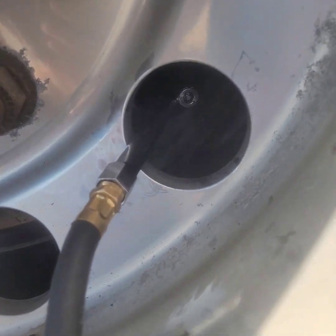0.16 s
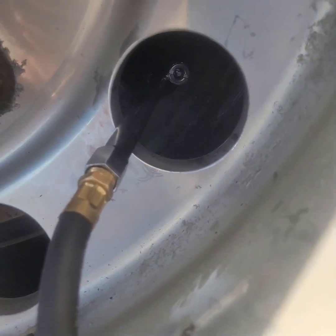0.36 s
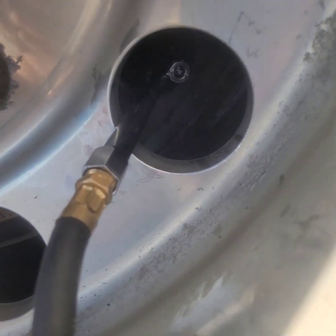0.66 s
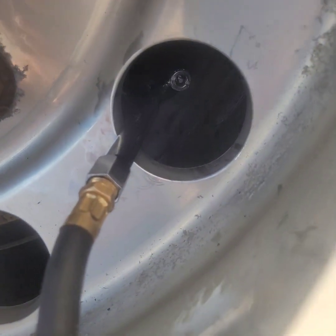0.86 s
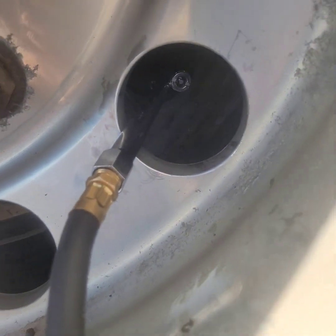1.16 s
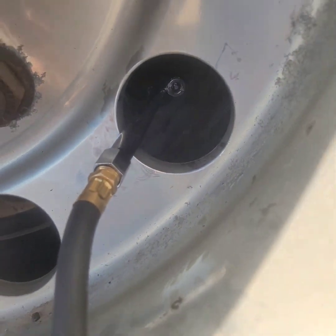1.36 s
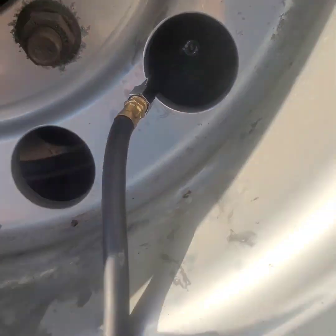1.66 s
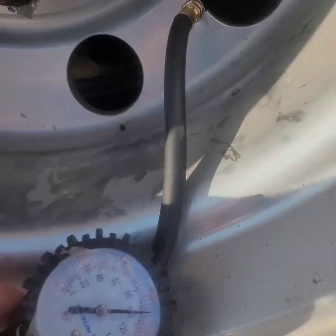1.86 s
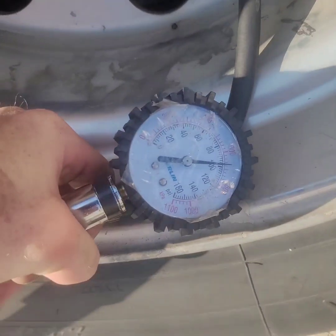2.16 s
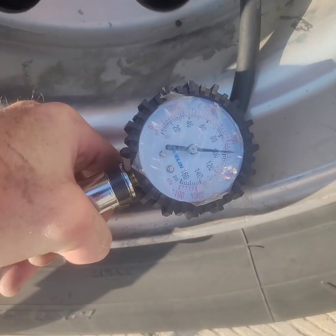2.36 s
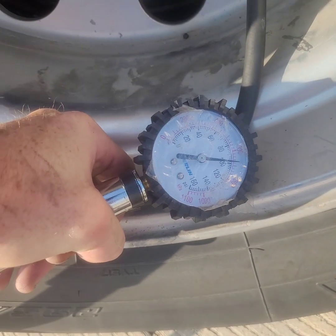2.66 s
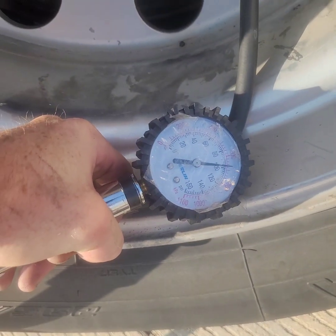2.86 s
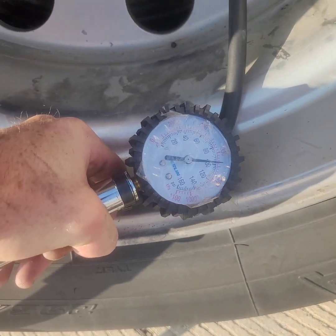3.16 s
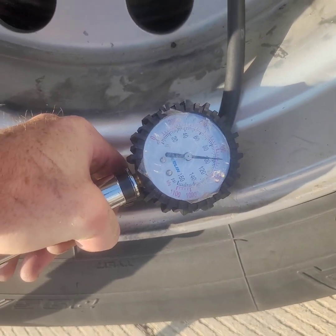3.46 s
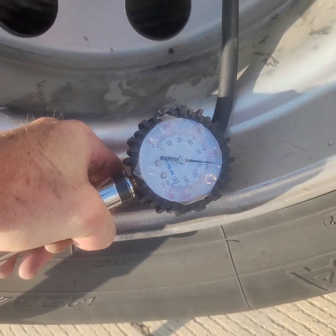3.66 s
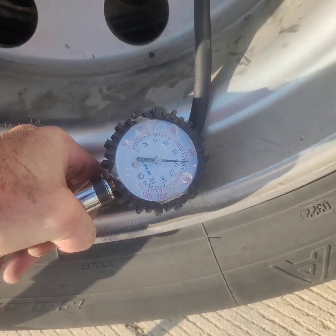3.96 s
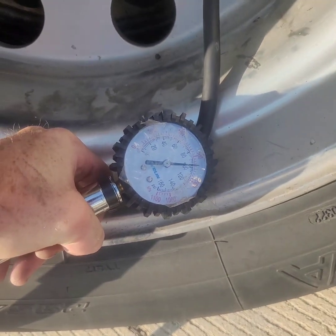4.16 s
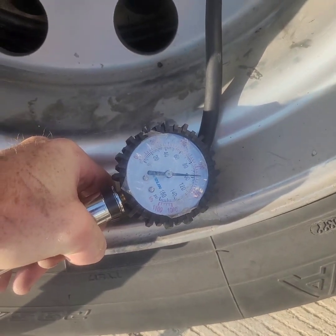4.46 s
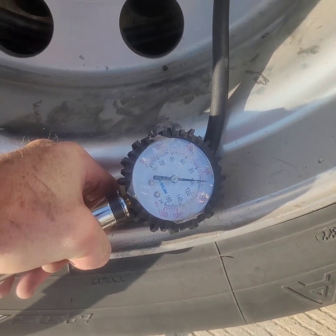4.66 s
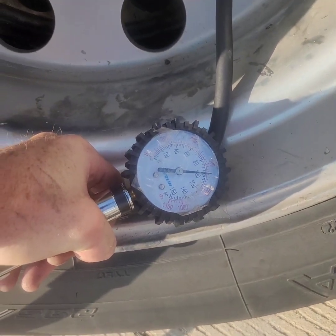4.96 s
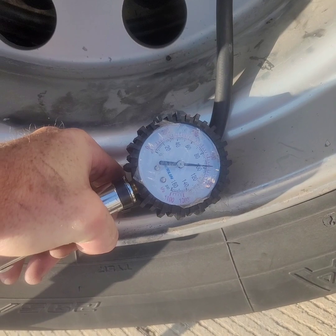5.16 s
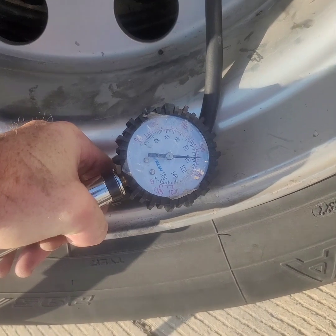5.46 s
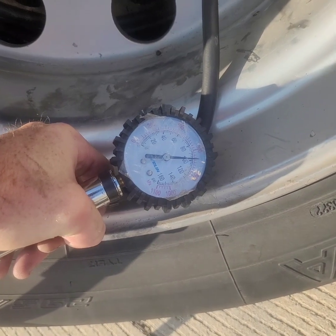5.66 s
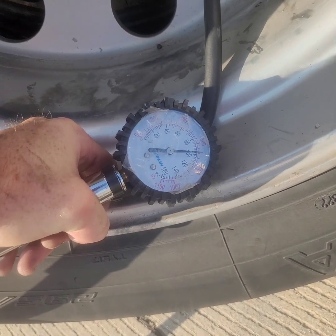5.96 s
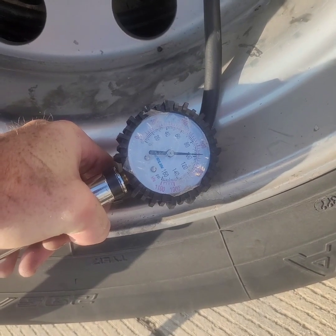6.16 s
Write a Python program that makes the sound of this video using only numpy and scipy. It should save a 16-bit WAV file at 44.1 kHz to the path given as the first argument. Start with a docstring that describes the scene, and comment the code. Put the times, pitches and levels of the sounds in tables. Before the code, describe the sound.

A nearby engine rumbles and clatters steadily while compressed air hisses, thin and very bright, into a truck tire, with a few dull early thuds.

```python
"""At the metal wheel of a truck: compressed air hisses through a chuck and gauge into the tire.
An engine runs steadily nearby: firing tones, puffing rumble, clatter and thin belt-drive whines.
The microphone starts at the valve hole, in the booming hollow of the wheel, then backs away to the gauge.
The air is coloured noise; a sliding reflection off the wheel gives its brightest part a hollow colour.
A few low thuds fall early on, and at the gauge the engine noise and the air step up in level."""
import sys
import numpy as np
from scipy import signal
from scipy.fft import rfft, irfft
from scipy.io import wavfile

SR = 44100
rng = np.random.default_rng(int(sys.argv[2]) if len(sys.argv) > 2 else 0)


def transcribe(u):
    """Save the signal u as a 16-bit wav file named by the first command-line argument.

    u: samples, shape (n,) or (channels, n), limited to [-1, 1]; the rate is SR.
    q: integer samples, one column per channel.
    """
    v = np.clip(np.atleast_2d(u).T, -1, 1)
    q = np.round(v * 32767).astype(np.int16)
    wavfile.write(sys.argv[1], SR, q)


N = 277830

# Orders of the engine's firing pulses, four firings a cycle:
# (multiple of the cycle rate [-], relative level [dB])
FIRING_ORDERS = [(2, -6.5), (3, -23.5), (4, 0), (6, -15), (7, -10), (8, -7.5), (10, -13.5), (11, -27.5),
                 (12, -15.5), (15, -24.5), (19, -24.5)]
# Faint tones of the belt-driven parts: (frequency [Hz], rms level [dB])
BELT_WHINES = [(263.5, -38.5), (305, -45), (528, -48.5), (625, -52.5), (666, -54)]
# Resonances of the wheel's hollow: (frequency [Hz], half-width at half gain [Hz], rms level up close [dB])
HOLLOW_MODES = [(50.5, 5.6, -24.5), (70.5, 9.2, -25.5), (133, 26, -31), (244, 22, -29.5),
                (388.4, 15.4, -32), (457, 11, -43), (530, 40, -42), (840, 73, -37.5), (1005, 140, -36.5),
                (1380, 210, -42.5), (4500, 640, -51.5)]
# Spectra of the engine's exhaust rumble and clatter: (frequency [Hz], relative density [dB per Hz])
RUMBLE_SPECTRUM = [(20, -28), (32, -28), (44, 0), (60, -1.5), (72, -1), (88, -3.5), (110, -1.5), (132, 1),
                   (185, -6), (240, -2), (290, -8), (400, -14), (600, -20), (3000, -67)]
CLATTER_SPECTRUM = [(100, -20.5), (300, -5.5), (470, -4), (640, 0.8), (780, -3), (950, -2.5), (1100, -6.5),
                    (1320, -7.5), (1600, -12.5), (2200, -17.5), (4000, -42.5), (10000, -57)]
# Spectra of the air in hose, chuck and valve core: (frequency [Hz], relative density [dB per Hz])
RUSH_SPECTRUM = [(800, -3.5), (2000, -1), (2900, 1.5), (3500, 0.2), (4000, -2.5), (5000, -4), (6000, -12.5),
                 (8000, -10), (12000, -36)]
SIZZLE_SPECTRUM = [(4000, -12), (5800, -2), (6700, -1.5), (7700, 0.5), (8400, -3.5), (9200, -6),
                   (10500, -3), (13000, -12)]
JET_SPECTRUM = [(7000, -40), (9200, -17), (9900, -8), (10600, -7.5), (11400, -3), (12500, -3),
                (13500, -1.5), (14700, -0.5), (15300, 5), (15750, 1)]
# Left-right likeness of the noise: (frequency [Hz], correlation, -1 opposed to 1 alike [-])
SIDE_LIKENESS = [(60, 0.26), (170, 0.94), (260, 0.78), (400, 0.48), (600, 0.47), (850, -0.35),
                 (1500, -0.17), (2500, 0.12), (6000, -0.16), (15000, 0.054)]
# Dull bumps over the hum: (time [s], envelope peak [dB])
BUMP_TIMES = [(0.608, -4), (1.169, -12), (1.339, -9), (2.006, -8)]
# Lag of the wheel's reflection at the gauge, following the sway of the hand: (time [s], lag [ms])
GAUGE_LAG = [(2.3, .62), (2.7, .568), (3.1, .54), (3.5, .568), (4.0, 0.53), (4.7, .56), (5.3, .489)]

# Layer levels before panning, after the step up: (at the valve [dB], at the gauge [dB])
HUM_DB = (-18.5, -20.0)   # for firing orders at 0 dB
RUMBLE_DB = (-18.5, -22)
CLATTER_DB = (-27, -27)
RUSH_DB = (-41, -40.5)
SIZZLE_DB = (-40, -44.5)
JET_DB = (-31, -31)

CYCLE_HZ = 20.8
PORT_PHASE = 0.4   # radians by which the left microphone port leads, at every frequency
LOW_CUT_HZ, CUTOFF_HZ = 18, 15770
# middle and length of the microphone's one move out of the hollow
BACK_AWAY_AT_S, BACK_AWAY_S = 1.446, 0.58
# middle, length and size of the step up at the gauge
STEP_AT_S, STEP_S, STEP_DB = 2.58, 0.29, 2
# the rush overshoots at that step, then settles
RUSH_SWELL_DB, RUSH_SETTLE_S = 1.7, 0.76
VALVE_LAG_MS = 0.313   # lag of the wheel's reflection at the valve

TIME = np.arange(N) / SR
HZ = np.maximum(np.fft.rfftfreq(N, 1 / SR), 1)
SIDES = np.array([[1], [-1]])   # left, right


def from_db(db):
    """Decibels to gain."""
    return 10 ** (np.asarray(db) / 20)


def rms_one(x):
    """Scale to unit rms."""
    return x / np.sqrt(np.mean(x ** 2) + 1e-20)


def over_hz(points):
    """A table joined by straight lines on a log-frequency axis."""
    hz, value = np.transpose(points)
    return np.interp(np.log(HZ), np.log(hz), value)


def pan(left_db):
    """Gains of the two sides for a left-minus-right level."""
    return from_db(SIDES * left_db / 2)


def ease(middle_s, length_s):
    """A smooth move from 0 to 1."""
    progress = np.clip((TIME - middle_s) / length_s, -.5, .5)
    return (1 + np.sin(np.pi * progress)) / 2


def nearness():
    """1 while the microphone is in the hollow of the wheel, 0 once it has backed away."""
    return 1 - ease(BACK_AWAY_AT_S, BACK_AWAY_S)


def heard_db(*layers):
    """Each layer passes from its valve level to its gauge level; all are held down until the step."""
    near = nearness()
    held_down_db = STEP_DB * (1 - ease(STEP_AT_S, STEP_S))
    return [near * valve_db + (1 - near) * gauge_db - held_down_db for valve_db, gauge_db in layers]


def drift(rate_hz):
    """Random wander of rms 1: white noise with the parts faster than the rate damped."""
    damping = 1 + (HZ / rate_hz) ** 2
    return rms_one(irfft(rfft(rng.standard_normal(N)) / damping, N))


def turbulence(gain):
    """Stereo noise of rms 1, coloured by a gain per frequency; the sides mix a shared and an opposed part."""
    shared, opposed = rfft(rng.standard_normal((2, N)))
    alike = np.clip(over_hz(SIDE_LIKENESS), -1, 1)
    both = np.sqrt(1 + alike) * shared + np.sqrt(1 - alike) * opposed * SIDES
    port_lead = np.exp(.5j * PORT_PHASE * SIDES)
    return rms_one(irfft(gain * both * port_lead, N))


def flow(spectrum, level_db, flutter_db, flutter_hz):
    """Turbulence with a spectrum, a level and a slight random flutter."""
    level = from_db(level_db + flutter_db * drift(flutter_hz))
    return level * turbulence(from_db(over_hz(spectrum)))


def echoes(x, lags_s, shares):
    """Add reflections whose lags may move, then scale to keep the power roughly the same."""
    fine = signal.resample_poly(x, 4, 1, axis=1)   # quarter-sample steps let the lags slide
    out = x
    for lag_s, share in zip(lags_s, shares):
        at = np.clip(np.round(4 * SR * (TIME - lag_s)), 0, 4 * N - 1).astype(int)
        reflection = np.take_along_axis(fine, np.broadcast_to(at, x.shape), axis=1)
        out = out + share * reflection
    return out / np.sqrt(1 + sum(share ** 2 for share in shares))


def scattered(x, share, longest_s, sway_s, count):
    """Weak reflections off rim, tire and ground ripple the spectrum; the hand's sway shifts them."""
    sway = sway_s * drift(1.2)
    lags = []
    for _ in range(count):
        rest_lag = rng.uniform(0.000996, longest_s, (2, 1))   # each side has its own
        lags.append(rest_lag + rng.standard_normal((2, 1)) * sway)
    signs = rng.choice([-1, 1], (count, 2, 1))
    return echoes(x, lags, signs * share / np.sqrt(count))


def hum(angle, uneven, scatter):
    """Firing tones locked to the cycle angle; all waver as the cylinders vary, odd orders twice as much."""
    out = 0
    port_lead = .5 * PORT_PHASE * SIDES
    for order, level_db in FIRING_ORDERS:
        waver = uneven * drift(5.4) * (1 if order % 2 else .5)
        start = scatter * rng.standard_normal()
        out = out + from_db(level_db) * (1 + waver) * np.cos(order * angle + port_lead + start)
    return np.sqrt(2) * out


def engine():
    """Firing hum, exhaust rumble that puffs with crank turns and firings, and lightly pulsing clatter."""
    hum_db, rumble_db, clatter_db = heard_db(HUM_DB, RUMBLE_DB, CLATTER_DB)
    cycle_hz = CYCLE_HZ * (1 + 0.0019 * drift(1.25))
    angle = 2 * np.pi * np.cumsum(cycle_hz) / SR
    puffs = (np.cos(2 * angle) + np.cos(4 * angle)) / 2   # two turns, four firings a cycle
    tones = from_db(hum_db) * hum(angle, uneven=0.22, scatter=0.54)
    rumble = flow(RUMBLE_SPECTRUM, rumble_db, flutter_db=0.55, flutter_hz=11) * (1 + 0.12 * puffs)
    clatter = flow(CLATTER_SPECTRUM, clatter_db, flutter_db=0.58, flutter_hz=22) * (1 + 0.037 * puffs)
    clatter = scattered(clatter, share=0.3, longest_s=.015, sway_s=0.00013, count=6)
    return (tones + rumble) * pan(left_db=-0.44) + clatter * pan(left_db=-1.0)


def whines():
    """Thin tones from the belt drive, their phases wandering at random."""
    out = np.zeros(N)
    for hz, level_db in BELT_WHINES:
        phase = 2 * np.pi * hz * TIME + 1.73 * drift(2.75)
        out += from_db(level_db) * np.sqrt(2) * np.cos(phase)
    return out


def wheel_hollow():
    """The engine's noise booms in the dish of the wheel: resonant noise bands heard only close to it."""
    boom = 0
    for hz, width_hz, level_db in HOLLOW_MODES:
        resonance = 1 / (1 + ((HZ - hz) / width_hz) ** 2)
        boom = boom + from_db(level_db) * turbulence(resonance)
    return nearness() * boom


def off_wheel(x, left_share, right_share):
    """One short reflection combs the sound; its teeth slide as the microphone moves."""
    near = nearness()
    time_s, lag_ms = np.transpose(GAUGE_LAG)
    gauge_lag_ms = np.interp(TIME, time_s, lag_ms)
    heard_lag_ms = near * VALVE_LAG_MS + (1 - near) * gauge_lag_ms
    return echoes(x, [heard_lag_ms / 1000], [np.array([[left_share], [right_share]])])


def rush_swell_db():
    """The rush swells with the step and dies back."""
    settling = np.exp(-np.maximum(TIME - STEP_AT_S, 0) / RUSH_SETTLE_S)
    return RUSH_SWELL_DB * ease(STEP_AT_S, STEP_S) * settling


def air():
    """Air rushes along the hose, sizzles in the chuck and leaves the valve core as a very bright jet."""
    rush_db, sizzle_db, jet_db = heard_db(RUSH_DB, SIZZLE_DB, JET_DB)
    near = nearness()
    rush = flow(RUSH_SPECTRUM, rush_db + rush_swell_db(), flutter_db=0.55, flutter_hz=23)
    sizzle = flow(SIZZLE_SPECTRUM, sizzle_db, flutter_db=0.73, flutter_hz=21)
    jet = flow(JET_SPECTRUM, jet_db, flutter_db=0.5, flutter_hz=25)
    jet = jet * (near * pan(left_db=4.0) + (1 - near) * pan(left_db=2.0))
    jet = off_wheel(jet, left_share=.05, right_share=0.17)
    hiss = rush * pan(left_db=2.5) + sizzle * pan(left_db=3.0) + jet
    return scattered(hiss, share=0.21, longest_s=.006, sway_s=.000015, count=7)


def bumps(low_hz, high_hz, rise_s):
    """Short low thuds: two sines under an envelope that swells and dies within a few cycles."""
    out = np.zeros(N)
    for time_s, peak_db in BUMP_TIMES:
        age = np.maximum(TIME - time_s, 0)
        swing = (np.sin(2 * np.pi * low_hz * age) + np.sin(2 * np.pi * high_hz * age)) / 2
        envelope = age / rise_s * np.exp(1 - age / rise_s)
        out += from_db(peak_db) * swing * envelope
    return out


def scene():
    """Engine, air and bumps together at the wheel."""
    return engine() + whines() + wheel_hollow() + air() + bumps(low_hz=69.4, high_hz=150.4, rise_s=0.0063)


def record(dry):
    """The microphone's signal: peaks are rounded, the deepest bass is shed and the top is cut steeply."""
    rounded = dry / (1 + (dry / .95) ** 8) ** (1 / 8)
    faded = rounded * signal.windows.tukey(N, .001)   # tiny fades at both ends
    low_cut = signal.butter(4, LOW_CUT_HZ, "high", fs=SR, output="sos")
    thinned = signal.sosfilt(low_cut, faded)
    top_cut = signal.firwin(1601, CUTOFF_HZ, fs=SR)
    return signal.fftconvolve(thinned, top_cut[None], mode="same", axes=1)


dry = scene()
out = record(dry)
transcribe(out)
```